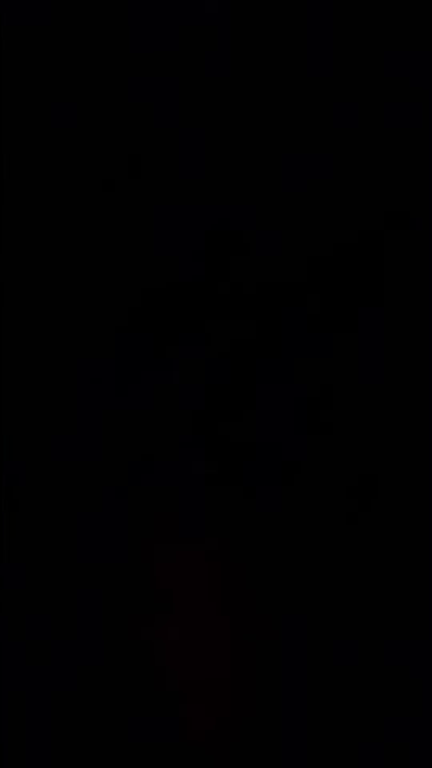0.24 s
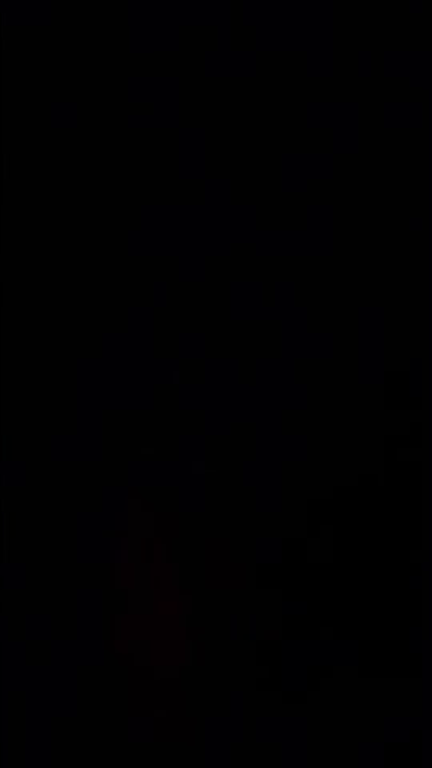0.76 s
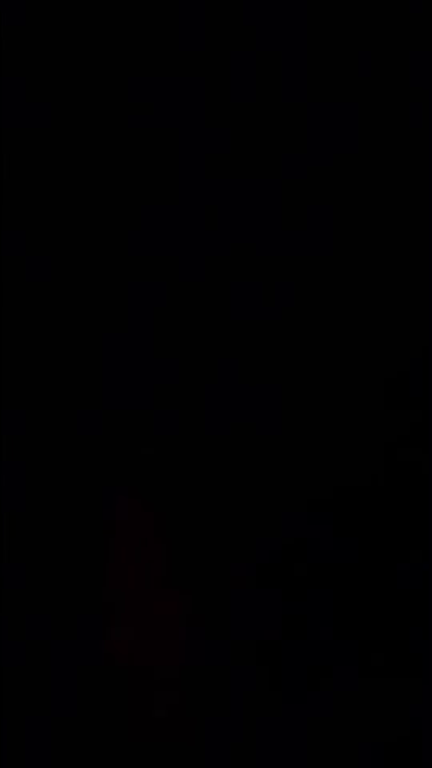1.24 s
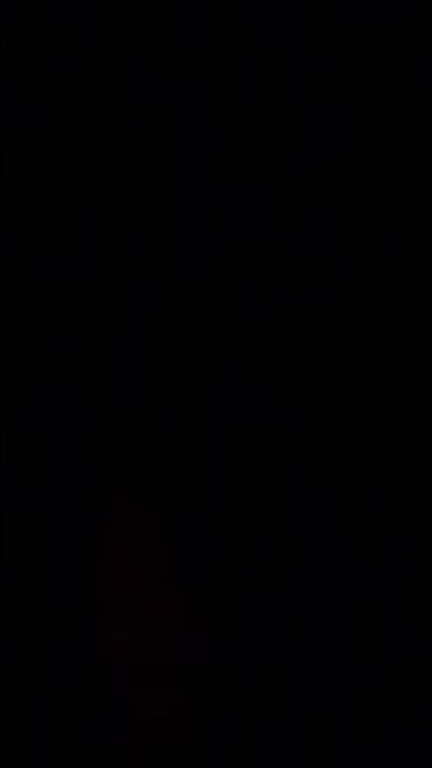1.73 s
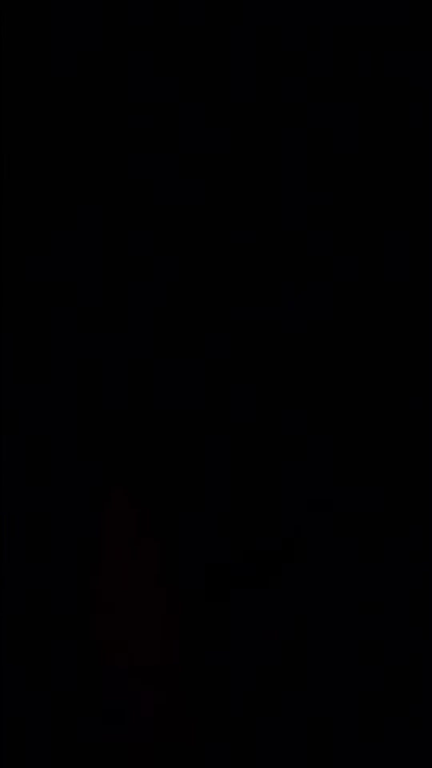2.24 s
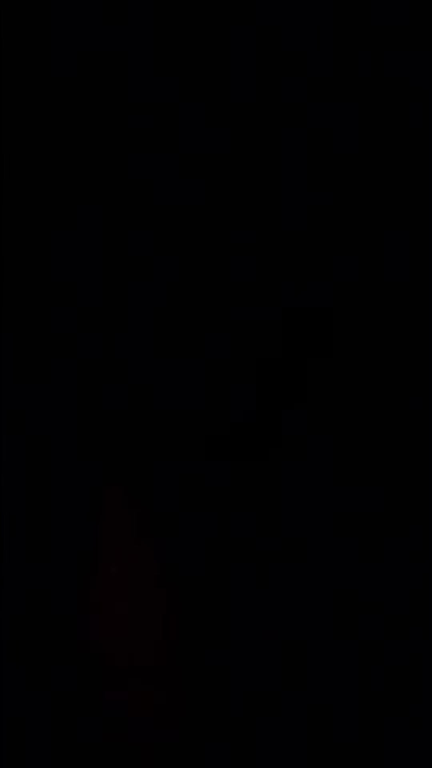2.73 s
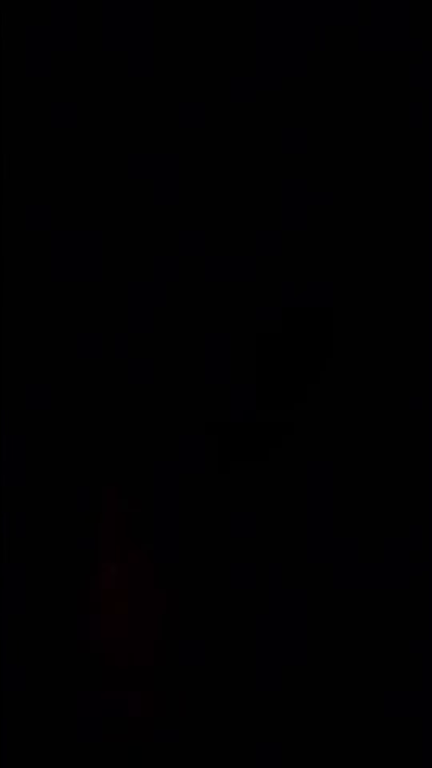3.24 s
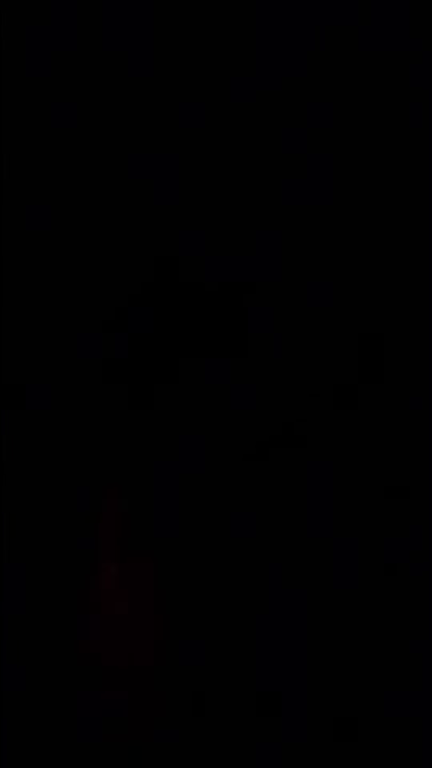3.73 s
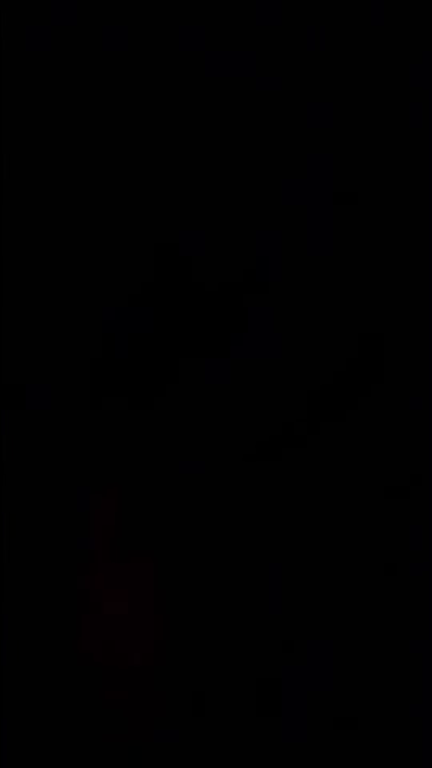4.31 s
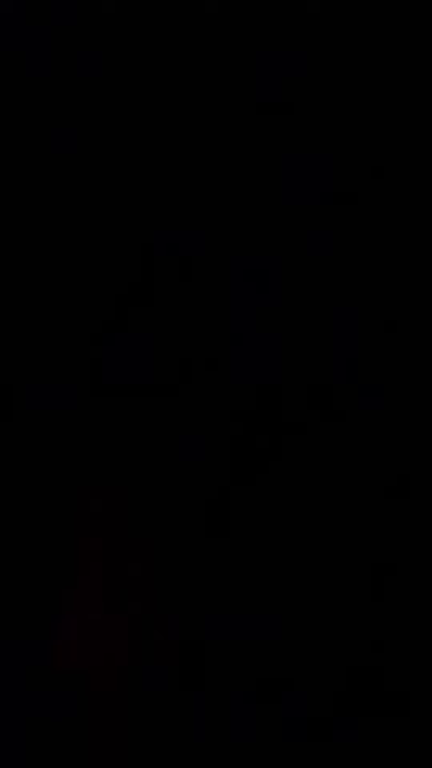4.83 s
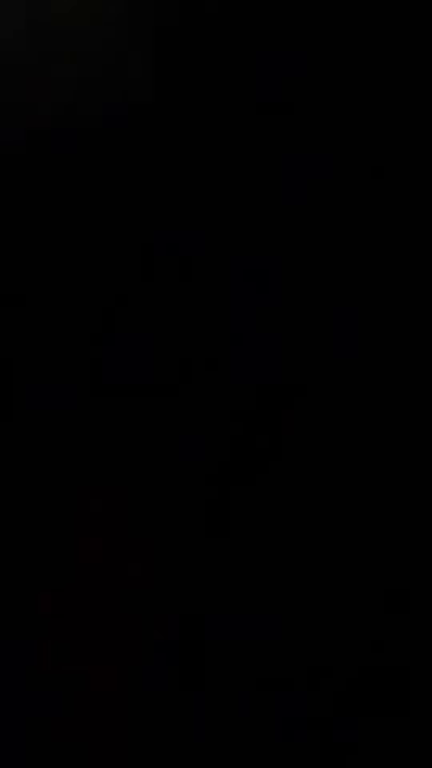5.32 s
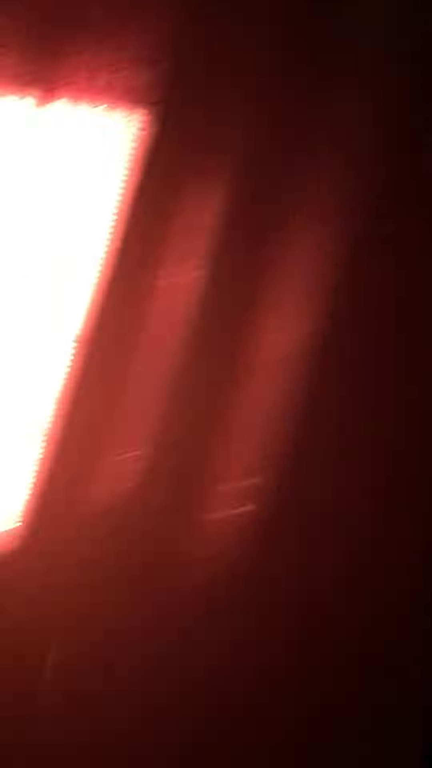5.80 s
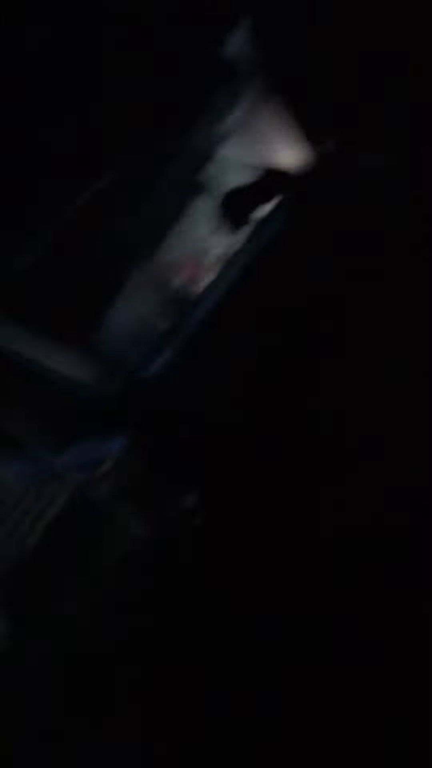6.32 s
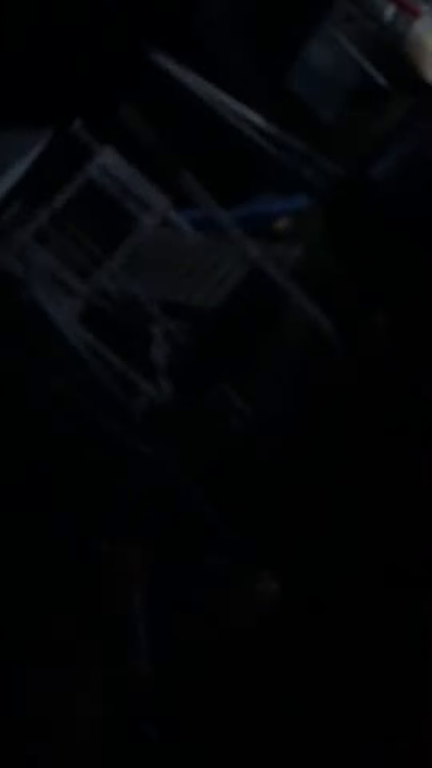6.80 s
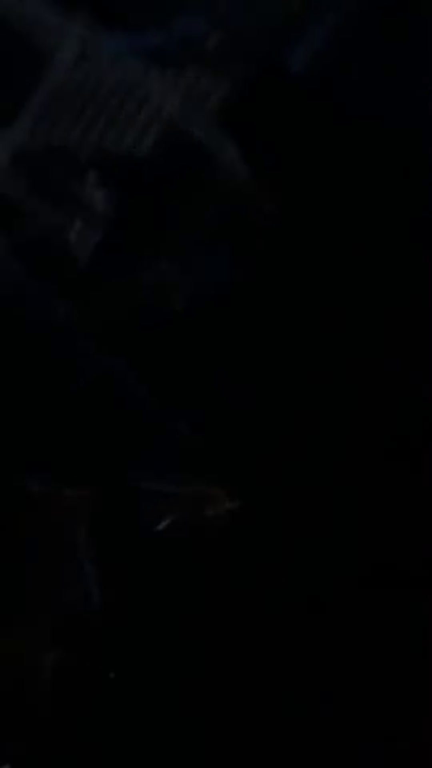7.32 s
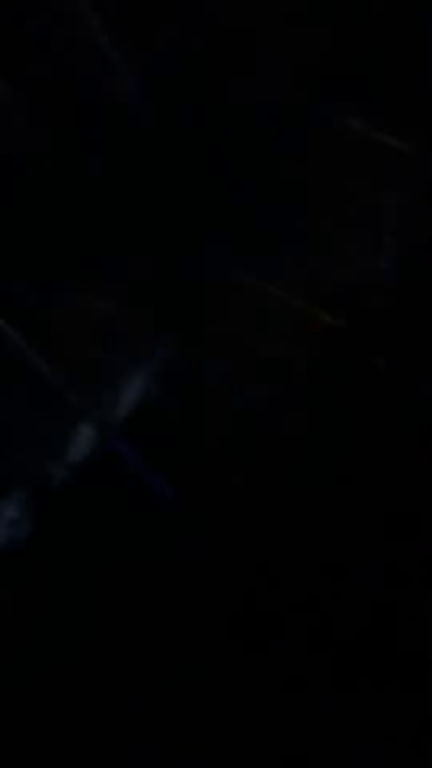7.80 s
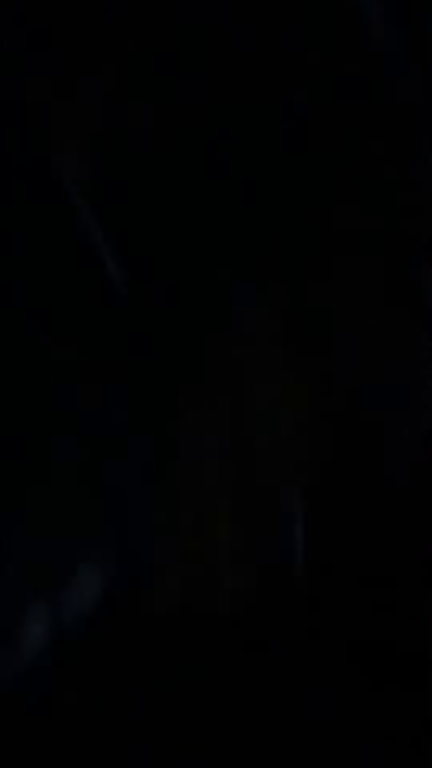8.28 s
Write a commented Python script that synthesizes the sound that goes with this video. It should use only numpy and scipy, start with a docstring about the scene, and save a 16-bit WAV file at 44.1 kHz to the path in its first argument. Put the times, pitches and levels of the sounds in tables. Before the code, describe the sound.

An idling car booms unevenly from its tailpipe, then fades partway through to a quieter engine hum and whirr.

```python
"""A lumpy idle at night

A four-cylinder car idles fast outdoors, heard from behind its exhaust, then from along its side.
Uneven firings boom and excite the resonances of the pipe, booming more when the engine labours.
The engine whirrs and ticks, and friction makes its belt chirp once a lap.
Clothing rustles softly over a faint hiss as the microphone is carried away from the tailpipe."""
import sys
import numpy as np
from scipy import signal
from scipy.fft import rfft, irfft
from scipy.io import wavfile
from scipy.ndimage import uniform_filter1d

SR = 44100
rng = np.random.default_rng(int(sys.argv[2]) if len(sys.argv) > 2 else 0)


def to_wav(s):
    """Save 16-bit WAV."""
    ch = np.atleast_2d(s).T  # columns
    pcm = np.round(np.clip(ch, -1, 1) * 32767)  # PCM
    wavfile.write(sys.argv[1], SR, pcm.astype(np.int16))


N = 377055
TIME = np.arange(N) / SR
IDLE_HZ, FIRINGS_PER_LAP = 37.8, 5.995  # nominal firing rate; length of one belt lap

# engine speed: time_s, firing_hz
FIRING_RATE = [(0, 37.96), (.41, 38.06), (.6, 37.01), (.9, 37.85), (1.65, 37.52), (2.39, 38.24),
               (2.74, 36.47), (3.19, 36.18), (3.59, 37.98), (3.87, 38.06), (4.35, 36.79), (4.79, 38.58),
               (5.54, 36.97), (6.03, 37.71), (6.98, 37.96), (7.37, 36.39), (8.13, 38.23), (8.55, 37.93)]
# nearness of the tailpipe: time_s, gain_db
TAILPIPE_GAIN = [(0, -9.5), (2.5, -8), (3.4, -11.5), (5.2, -8), (5.45, -15), (6.3, -21), (7.6, -25),
                 (8.55, -22.5)]
# way round the car, from 0 behind to 1 alongside: time_s, side_share
SIDE_SHARE = [(5.15, 0.32), (5.6, 0.6), (6.4, 0.6), (7.8, 1)]


def undb(db):
    """Decibels to amplitude ratio."""
    return 10 ** (np.asarray(db) / 20)


def curve(rows):
    """Linear interpolation of (time_s, value) rows at every sample."""
    return np.interp(TIME, *np.transpose(rows))


def unit(x):
    """Normalisation to rms 1."""
    return x / np.sqrt(np.mean(x ** 2))


def colour(x, spectrum):
    """Spectral shaping by (frequency_hz, level_db) rows, falling away below the first; rms 1."""
    hz, db = np.transpose(spectrum)
    f = np.fft.rfftfreq(N, 1 / SR) + 1
    gain = undb(np.interp(np.log(f), np.log(hz), db)) * np.minimum(f / hz[0], 1) ** 2
    return unit(irfft(rfft(x) * gain, N))


def noise(spectrum):
    """Coloured Gaussian noise of rms 1."""
    return colour(rng.standard_normal(N), spectrum)


def lowpass(x, hz, order):
    """Butterworth low-pass filter."""
    return signal.sosfilt(signal.butter(order, hz, fs=SR, output="sos"), x)


def muffle(x, hz, order=4):
    """Zero-phase low-pass: filtering both ways keeps the crest of a pulse in place."""
    return lowpass(lowpass(x, hz, order)[::-1], hz, order)[::-1]


def wander(hz):
    """Random fluctuation, mostly slower than hz; rms 1."""
    return unit(lowpass(rng.standard_normal(N), hz, order=2))


def ring(x, modes):
    """Modal response: x drives damped resonances, and the wider ones die sooner."""
    t = TIME[:SR // 4]
    response = sum(undb(db) * np.exp(-np.pi * width * t) * np.cos(2 * np.pi * hz * t)
                   for hz, width, db in modes)
    return signal.fftconvolve(x, response)[:N]


def strikes(times, sizes):
    """Impulse train."""
    return np.bincount(np.clip(times * SR, 0, N - 1).astype(int), sizes, N)


def bursts(times, sizes, decay_s):
    """Envelope that jumps at each time and decays exponentially."""
    return signal.fftconvolve(strikes(times, sizes), np.exp(-TIME[:SR // 4] / decay_s))[:N]


def swell(turns, at, sharp):
    """Periodic modulation: a smooth bump of height 1 once a turn."""
    return np.exp(sharp * (np.cos(2 * np.pi * (turns - at)) - 1))


def half_firings(phase):
    """Times of each firing and of the midpoints between them."""
    return np.interp(np.arange(1, int(2 * phase[-1])) / 2, phase, TIME)


def hiss():
    """Noise floor: a faint broadband hiss that rises and falls in level."""
    # loudness: time_s, level_db
    level = [(0, -72.5), (5.3, -71), (5.8, -64), (7.8, -69), (8.1, -61)]
    # timbre: frequency_hz, level_db
    spectrum = [(1000, 4), (4000, 5), (5000, -8.5), (6300, 6.5), (7600, -3), (9500, 0.2), (11000, 2),
                (15000, 1.5)]
    return undb(curve(level)) * noise(spectrum)


def clothing(grain_db=3.5):
    """Friction noise: rubbing cloth gives short, grainy swishes."""
    # swishes: centre_s, level_db, sigma_s
    rustles = [(5.975, -53, 0.0064), (6.23, -61, 0.023), (6.368, -58, 0.014), (6.415, -58.5, 0.011),
               (6.525, -57.5, 0.017), (6.695, -62, .035), (6.934, -59.5, 0.014), (7.198, -55, 0.066),
               (7.422, -60.5, 0.023), (7.483, -55.5, 0.014), (7.644, -64, 0.073)]
    # timbre of cloth: frequency_hz, level_db
    spectrum = [(2000, -27), (5000, -6.5), (6300, 0), (7500, -6), (9700, 3.5), (11500, -2), (13300, 3),
                (15500, -5)]
    envelope = sum(undb(db) * np.exp(-((TIME - s) / sigma) ** 2 / 2) for s, db, sigma in rustles)
    grain = undb(grain_db * wander(300))
    return envelope * unit(grain * noise(spectrum))


def ticks(phase, tick_db=-67, db_per_hz=1.6, scatter_db=2.0, jitter_s=.0015):
    """Impact excitation: small metal parts ring at and between firings, most of all once a belt lap."""
    # resonances of the parts: pitch_hz, width_hz, level_db
    modes = [(4200, 170, -8), (6100, 640, -8.5), (9540, 290, -3), (11450, 590, -1), (14600, 300, 6)]
    times = half_firings(phase)
    early_late, weak_strong = rng.standard_normal((len(times), 2)).T
    lap = np.interp(times, TIME, .3 + swell(phase / FIRINGS_PER_LAP, at=0.29, sharp=4))
    size = lap * np.resize([.4, 1], len(times)) * undb(scatter_db * weak_strong)
    rattle = bursts(times + jitter_s * early_late, size, decay_s=.005) * rng.standard_normal(N)
    side_fade = 1 - 0.69 * np.sqrt(curve(SIDE_SHARE))
    return undb(tick_db + db_per_hz * overspeed()) * side_fade * unit(ring(rattle, modes))


def belt(phase, chirp_hz=787, drift_hz=9, pulley_db=-5, attack_s=0.0022, release_s=.055, db_per_hz=3.4):
    """Friction-excited vibration: a patch on the belt catches a pulley once a lap and makes it sing."""
    # chirp at idle speed: time_s, level_db
    level = [(0, -43), (2.9, -42), (3.7, -50), (4.9, -41.5), (6.2, -50.5), (8.55, -78)]
    # resonances of the pulley and its bracket: pitch_hz, width_hz, level_db
    modes = [(750, 5, -0.5), (926, 110, 1.5)]
    pitch_hz = chirp_hz + drift_hz * wander(55)
    grip = 1 + 0.275 * wander(51)
    tone = np.sqrt(2) * np.sin(2 * np.pi * np.cumsum(pitch_hz) / SR)
    pulley = unit(muffle(ring(rng.standard_normal(N), modes), 900))
    sing = grip * tone + undb(pulley_db) * pulley
    laps_since_catch = (phase / FIRINGS_PER_LAP - .505) % 1
    age_s = laps_since_catch * FIRINGS_PER_LAP / curve(FIRING_RATE)
    rub = (1 - np.exp(-age_s / attack_s)) * np.exp(-(age_s / release_s) ** 2)
    return undb(curve(level) + db_per_hz * overspeed()) * rub * sing


def engine_bay(phase, lap_depth=0.51, crank_depth=0.4, block_db=-7.0, scatter_db=2.0, db_per_hz=1.83):
    """Amplitude modulation: the whirr swells with each belt lap and crank turn; knocks ring the block."""
    # whirr at idle speed: time_s, level_db
    level = [(0, -47), (2.5, -47), (5.1, -49), (5.6, -49), (6.5, -51), (7.3, -48), (8.55, -48.5)]
    # whirr from behind: frequency_hz, level_db
    rear_spectrum = [(330, 2.5), (480, 8), (620, 1.5), (890, 12.5), (1000, -12), (1180, 0.5), (1310, -1),
                     (1460, -20.5), (1630, -7.5), (1900, -12.5), (2600, -18), (3250, -25), (3700, -39.5),
                     (6000, -41)]
    # whirr from the side: frequency_hz, level_db
    side_spectrum = [(330, -3), (425, 4.5), (520, -6.5), (630, 2), (780, -11), (1000, -4.5), (1250, -7.5),
                     (1550, -13), (1850, -14), (2350, -15.5), (2950, -15), (3600, -27.5), (4600, -29.5),
                     (7000, -36)]
    # resonances of the block and its covers: pitch_hz, width_hz, level_db
    modes = [(1062, 27, -5), (1180, 19, -6), (1303, 25, 7.5), (1622, 18, 1.5), (1870, 36, -2.5),
             (2173, 31, -4), (2527, 32, -0.5), (2790, 10, -8), (3210, 20, -4.5)]
    side = curve(SIDE_SHARE)
    lap = 1 + lap_depth * (1 - side) * swell(phase / FIRINGS_PER_LAP, at=0.43, sharp=3.9)
    crank = 1 + crank_depth * swell(phase / 2, at=0.2, sharp=2)
    pulsing = lap * crank / uniform_filter1d(lap * crank, SR // 3)
    times = half_firings(phase)
    sizes = undb(scatter_db * rng.standard_normal(len(times)))
    knocks = lap ** 2 * bursts(times, sizes, decay_s=0.0035) * noise([(1000, 0.0), (3400, 0.014)])
    block = unit(muffle(ring(knocks, modes), 3500))
    from_rear = pulsing * noise(rear_spectrum) + undb(block_db) * block
    from_side = pulsing * noise(side_spectrum)
    blend = np.sqrt(1 - side) * from_rear + np.sqrt(side) * from_side
    return undb(curve(level) + db_per_hz * overspeed()) * blend


def ground_reflection(x, echo_db=-10):
    """Comb filtering: the ground echo cuts notches that slide as the microphone moves."""
    # delay behind the direct sound: time_s, lag_s
    lag = [(5.4, 0.00087), (6.6, 0.00097), (7.4, 0.00082), (8, 0.00077), (8.55, 0.00083)]
    echo = np.interp(TIME - curve(lag), TIME, x)
    return x + undb(echo_db) * curve(SIDE_SHARE) * echo


def overspeed():
    """Firing rate above idle, in Hz; ticks, belt and whirr grow louder with it."""
    return curve(FIRING_RATE) - IDLE_HZ


def load(ramp_s=.08):
    """Engine load from 0 to 1: each spell ramps up, holds and lets go."""
    # spells of labouring: start_s, end_s, load_share
    spells = [(0.442, 0.702, 0.68), (2.505, 3.425, 0.89), (3.65, 3.76, 0.93), (3.921, 4.432, 0.79),
              (5.057, 5.228, 0.75), (7.116, 7.95, 0.96)]
    held = sum(share * ((TIME > start) & (TIME < end)) for start, end, share in spells)
    return uniform_filter1d(held, int(ramp_s * SR))


def firings(phase, scatter_db=2.5, ceiling_db=1.0, lead_s=.0001, jitter_s=0.00067):
    """Combustion variability: times and strengths of the firings differ by cylinder and by chance."""
    # usual firing of each cylinder: strength_db
    cylinder_db = [-5, -0.5, -5, -1.5]
    # the hardest firings: time_s, strength_db
    hard_firings = [(.086, 0), (.349, 2.5), (.615, 3), (1.094, 1.5), (1.359, 1.5), (1.572, 3), (2.207, 3),
                    (2.365, 2.5), (2.523, 2.5), (2.961, 0.5), (3.014, 3), (3.234, 4), (3.452, 0.5),
                    (3.926, 2.5), (4.085, 2), (5.093, 3.5), (5.199, 1.5), (7.06, 3), (7.14, 4.5)]
    number = np.arange(1, int(phase[-1]) + 1)
    times = np.interp(number, phase, TIME)
    weak_strong, early_late = rng.standard_normal((len(number), 2)).T
    db = np.minimum(np.array(cylinder_db)[number % 4] + scatter_db * weak_strong, ceiling_db)
    for time_s, strength_db in hard_firings:
        db[np.argmin(abs(times - time_s))] = strength_db
    size = undb(db)
    # the valve opens ahead of the pressure crest, and a strong pulse arrives sooner
    return times - lead_s * size + jitter_s * early_late, size


def exhaust(phase, pop_db=-8.5, burble_db=-8.5, gas_db=-37, bark_db=-34, muffler_hz=312, shadow_hz=238):
    """Pipe resonance: firings ring the muffled pipe and stir a burble in it; gas spits out after each."""
    # resonances of the pipe: pitch_hz, width_hz, level_db
    pipe_modes = [(68, 160, -17.5), (129, 6.5, -1.5), (176.5, 13, 2), (190.8, 13, -1), (213.3, 11, -4),
                  (247.9, 8.6, -12.5), (269.7, 10, -5.5)]
    # resonances of its mouth: pitch_hz, width_hz, level_db
    mouth_modes = [(335, 100, 3.5), (450, 110, -1)]
    # escaping gas: frequency_hz, level_db
    gas_spectrum = [(330, 1), (450, 1.5), (580, -10), (780, -0.5), (910, -9.5), (1000, -16.5),
                    (1300, -15.5), (2000, -26.5), (5000, -52.5)]
    times, size = firings(phase)
    stir = bursts(times, size, decay_s=0.025) * rng.standard_normal(N)
    ringing = unit(ring(strikes(times, size ** 1.55), pipe_modes))
    burble = undb(burble_db) * unit(ring(stir, pipe_modes))
    pipe = unit(muffle(ringing + burble, muffler_hz, order=8))
    # acoustic shadow: the body of the car shades the upper pipe modes from the side
    shade = np.minimum(2 * curve(SIDE_SHARE), 1)
    pops = (1 - shade) * pipe + shade * muffle(pipe, shadow_hz)
    # every other cylinder spits more, and all do under load
    load_db = 4 * np.interp(times, TIME, load())
    spit = np.resize([1, .5], len(times)) * np.sqrt(size) * undb(load_db)
    gas = colour(bursts(times + 0.00081, spit, decay_s=0.016) * rng.standard_normal(N), gas_spectrum)
    # a hard firing barks above the pipe modes, straight out of the tailpipe
    bark = unit(muffle(ring(strikes(times, size ** 3), mouth_modes), 630, order=6))
    outflow = undb(pop_db) * pops + undb(gas_db) * gas + undb(bark_db) * (1 - shade) * bark
    return undb(curve(TAILPIPE_GAIN)) * outflow


def boom(phase, load_low_db=-2.5, load_high_db=6.5, waver_db=1.52, waver_hz=9):
    """Harmonics of the exhaust's pressure wave: load shifts weight from the firing rate to its octave."""
    # unloaded octave, fading as the microphone leaves the rear: time_s, level_db
    octave_level = [(0, -15.5), (1.4, -15.5), (3.6, -18.5), (5.3, -17.5), (5.8, -20), (6.2, -26),
                    (7.1, -29.5), (8.55, -33)]
    # steady overtones, before the tailpipe gain: firing_rate_multiple, level_db
    partials = [(1.5, -22), (3, -26), (4, -20.5), (6, -30)]
    effort, level_db = load(), curve(octave_level)
    low_db = np.interp(curve(SIDE_SHARE), [0, 1], [-3.5, -8.5])  # the fundamental is weaker alongside
    fundamental = undb(level_db + low_db + load_low_db * effort) * np.cos(2 * np.pi * (phase - 0.28))
    octave = undb(level_db + load_high_db * effort) * np.cos(4 * np.pi * phase)
    overtones = sum(undb(db) * np.cos(2 * np.pi * k * (phase - 0.17)) for k, db in partials)
    wave = fundamental + octave + undb(curve(TAILPIPE_GAIN)) * overtones
    return np.sqrt(2) * wave * undb(waver_db * wander(waver_hz))


def scene():
    """Superposition: one crank times every engine sound; cloth and hiss lie on top."""
    phase = -.27 + np.cumsum(curve(FIRING_RATE)) / SR  # counted in firings, two to a crank turn
    tailpipe = boom(phase) + exhaust(phase)
    machinery = ground_reflection(engine_bay(phase)) + belt(phase) + ticks(phase)
    return (tailpipe + machinery + clothing() + hiss())[None]


def record(dry, bottom_hz=8, top_hz=15750):
    """Band limiting: the microphone drops the deepest bass and cuts the top."""
    thin = signal.sosfilt(signal.butter(1, bottom_hz, "high", fs=SR, output="sos"), dry)
    return signal.sosfilt(signal.ellip(10, .1, 80, top_hz, fs=SR, output="sos"), thin)


dry = scene()
out = record(dry)
to_wav(out)
```